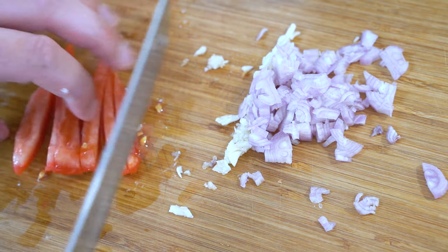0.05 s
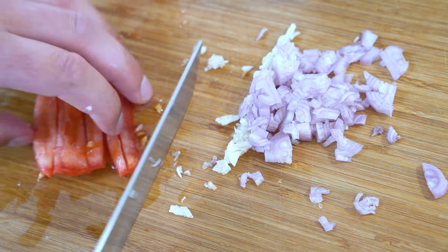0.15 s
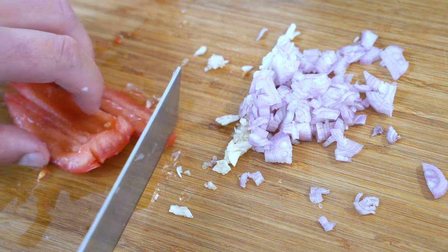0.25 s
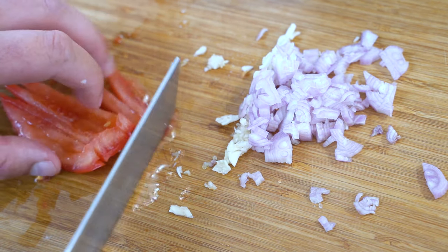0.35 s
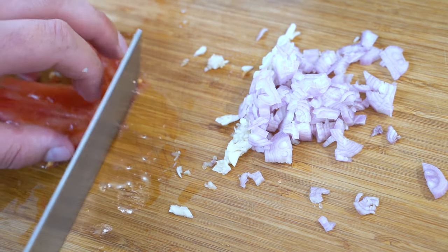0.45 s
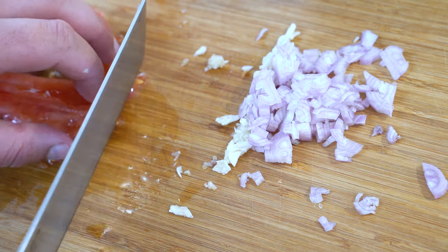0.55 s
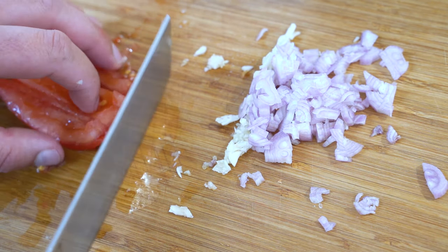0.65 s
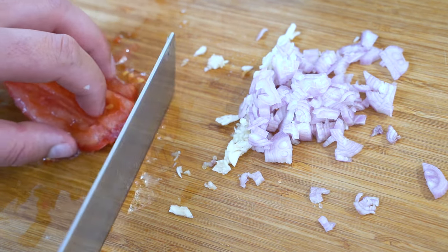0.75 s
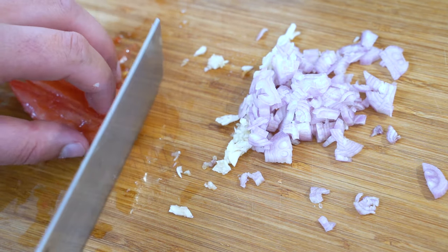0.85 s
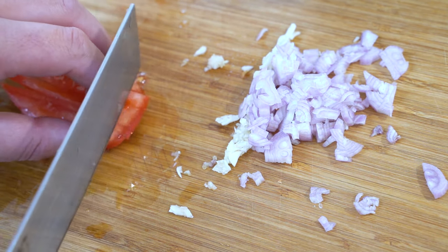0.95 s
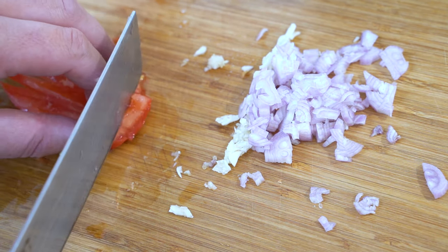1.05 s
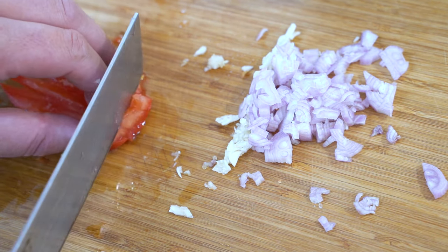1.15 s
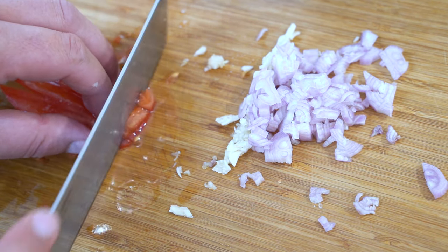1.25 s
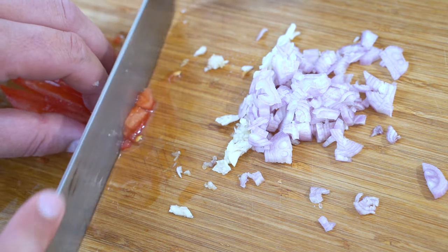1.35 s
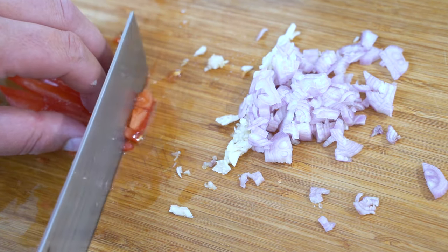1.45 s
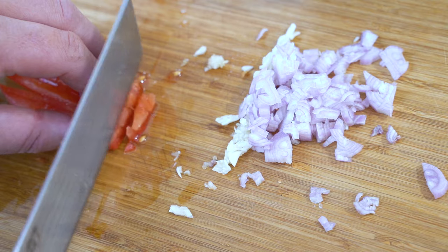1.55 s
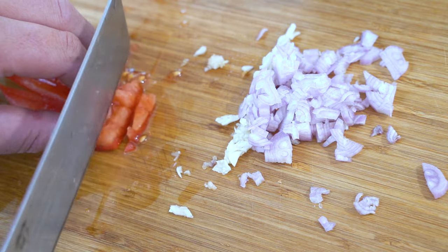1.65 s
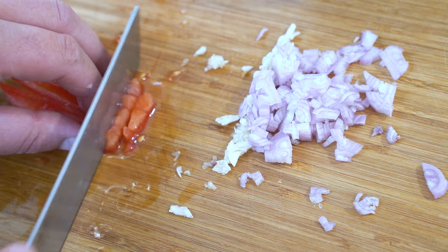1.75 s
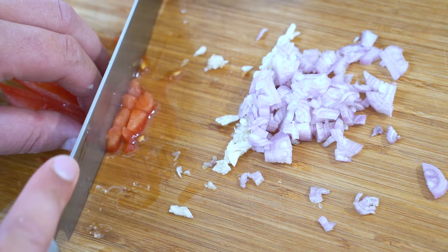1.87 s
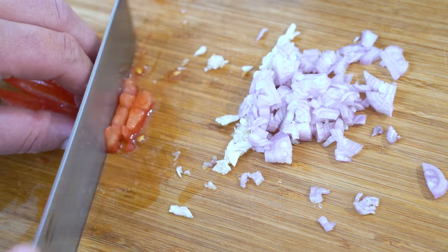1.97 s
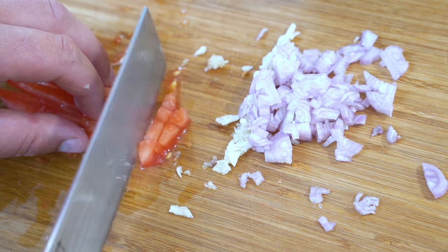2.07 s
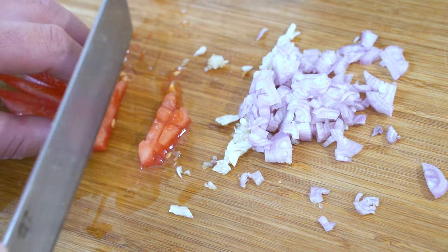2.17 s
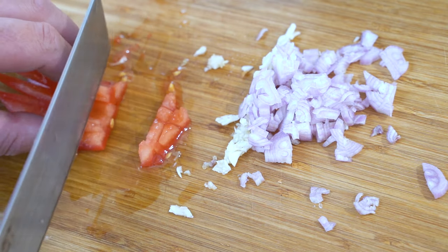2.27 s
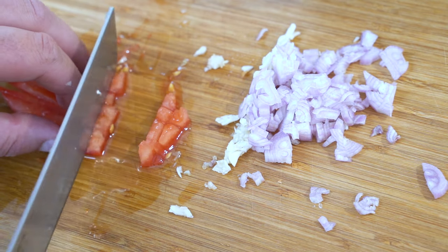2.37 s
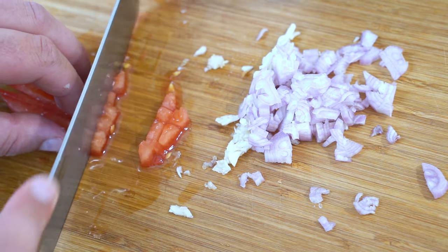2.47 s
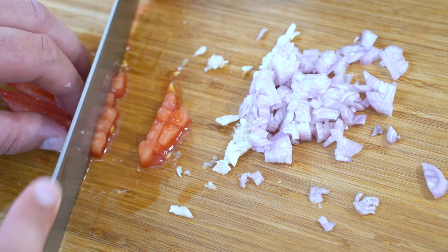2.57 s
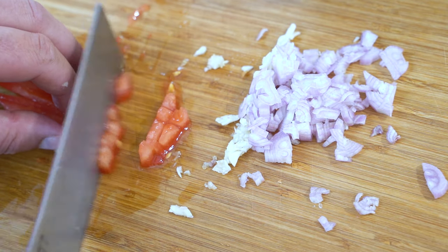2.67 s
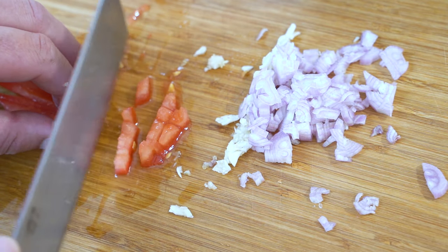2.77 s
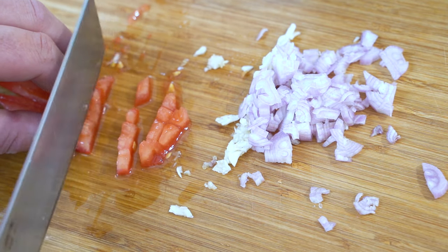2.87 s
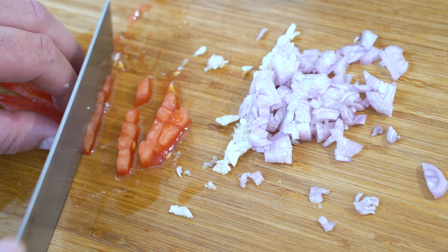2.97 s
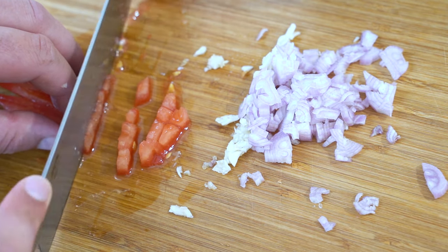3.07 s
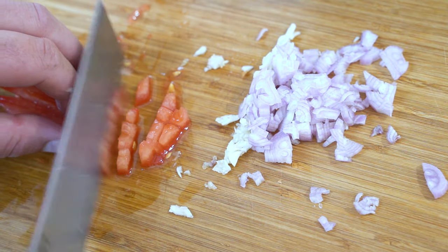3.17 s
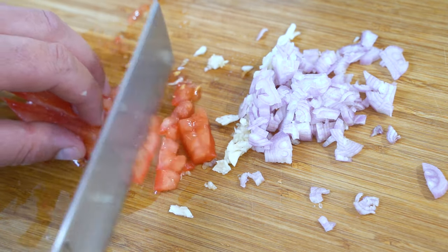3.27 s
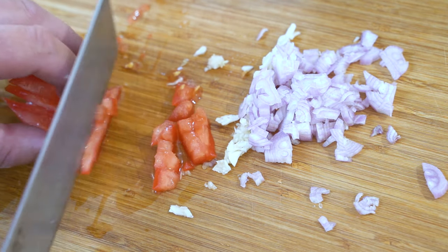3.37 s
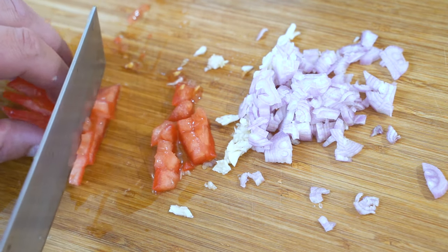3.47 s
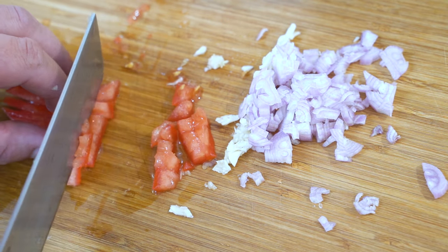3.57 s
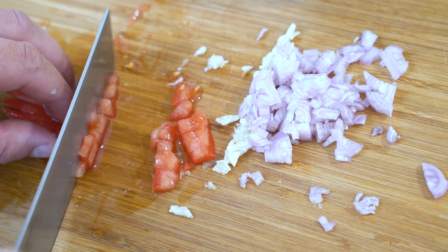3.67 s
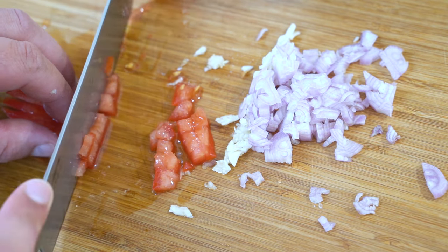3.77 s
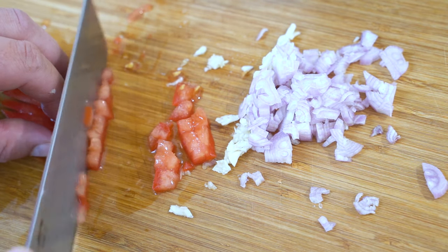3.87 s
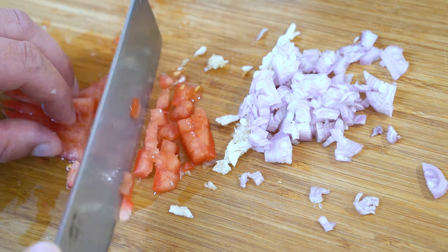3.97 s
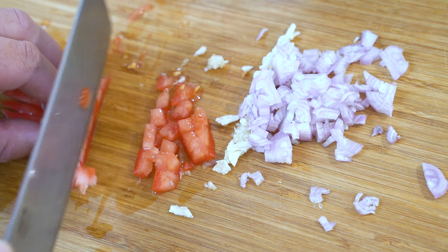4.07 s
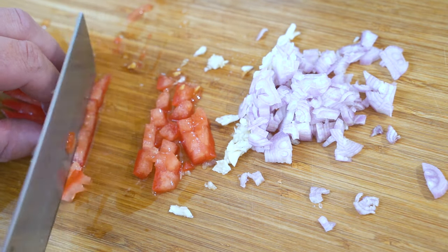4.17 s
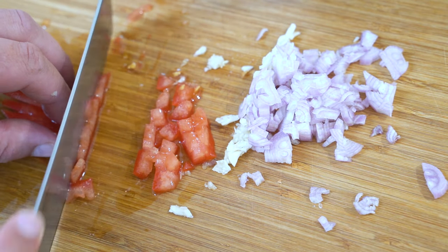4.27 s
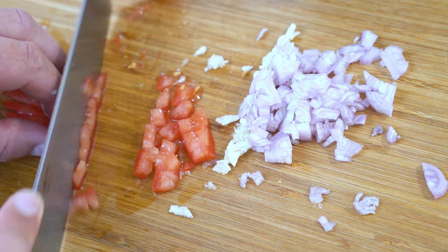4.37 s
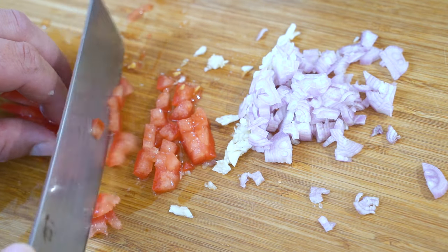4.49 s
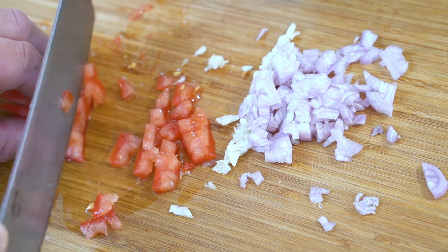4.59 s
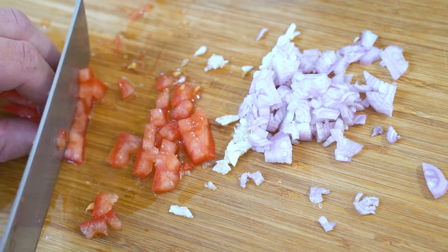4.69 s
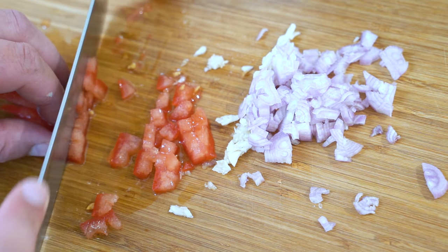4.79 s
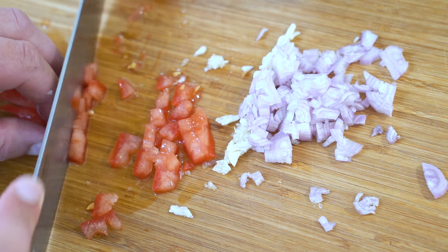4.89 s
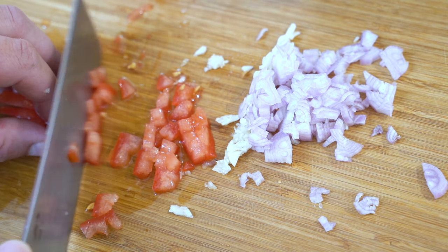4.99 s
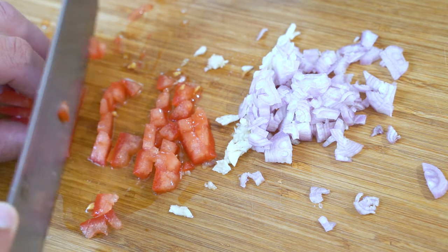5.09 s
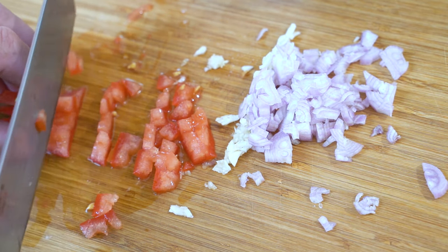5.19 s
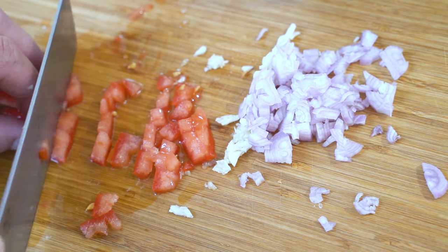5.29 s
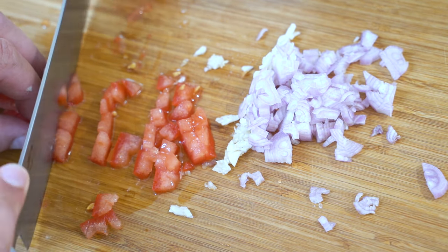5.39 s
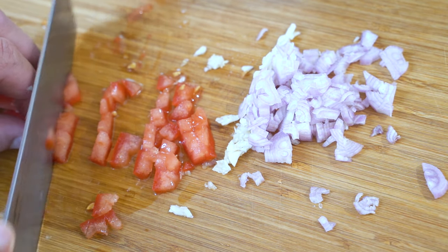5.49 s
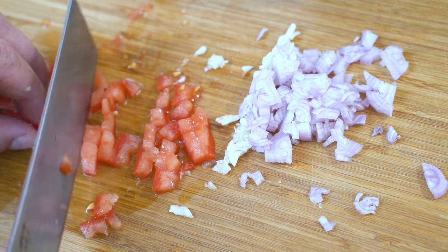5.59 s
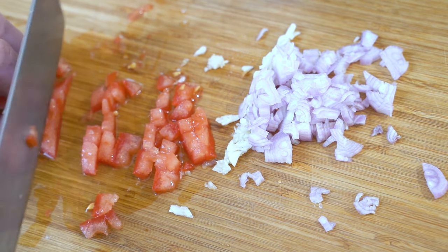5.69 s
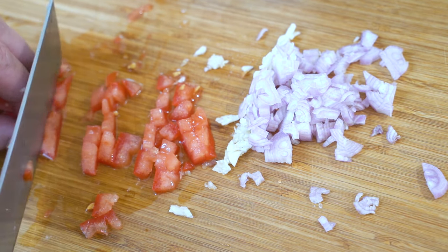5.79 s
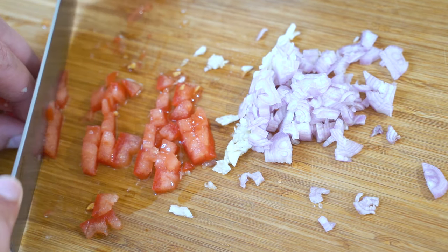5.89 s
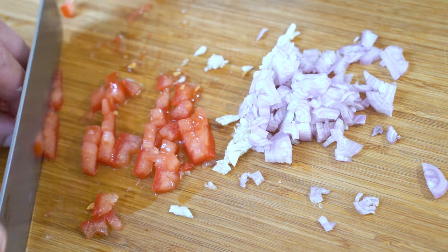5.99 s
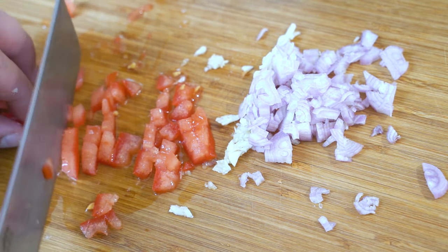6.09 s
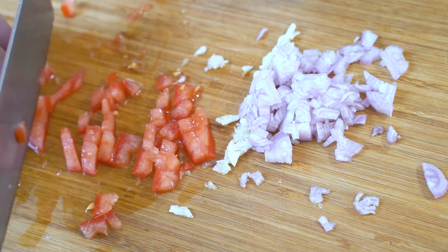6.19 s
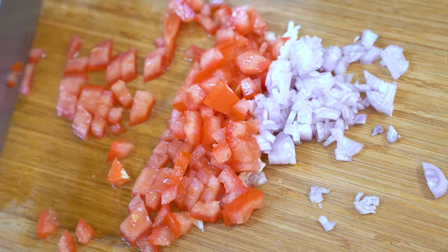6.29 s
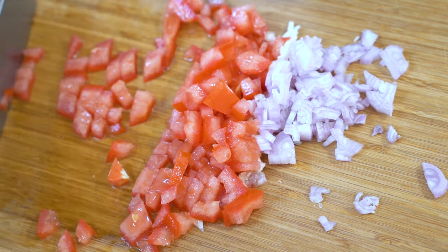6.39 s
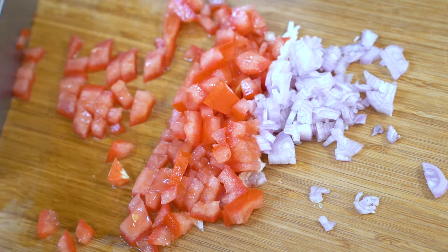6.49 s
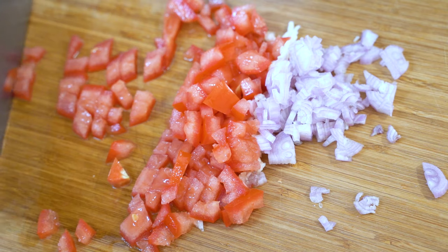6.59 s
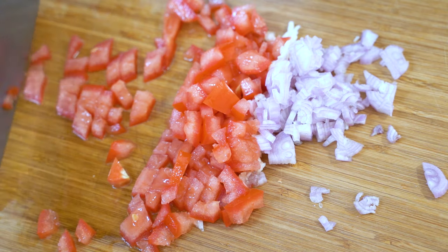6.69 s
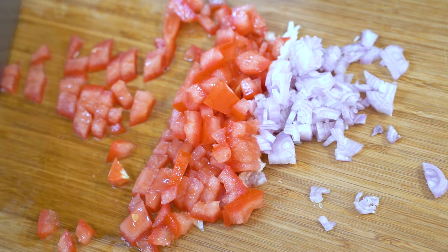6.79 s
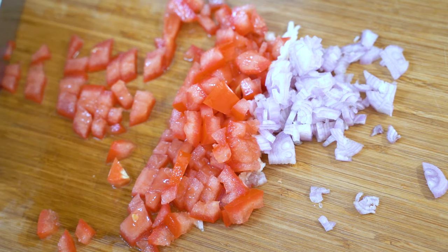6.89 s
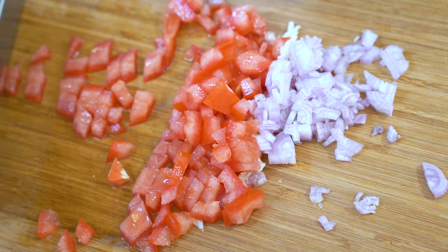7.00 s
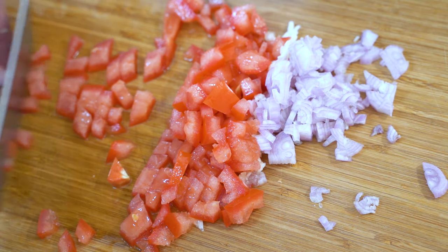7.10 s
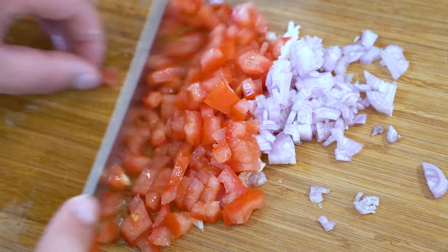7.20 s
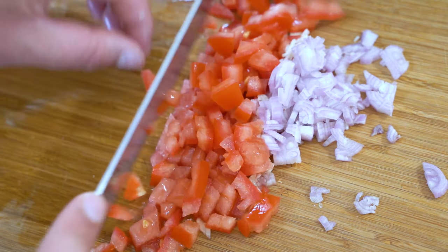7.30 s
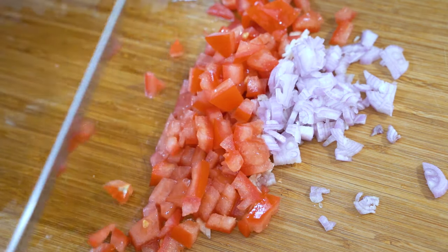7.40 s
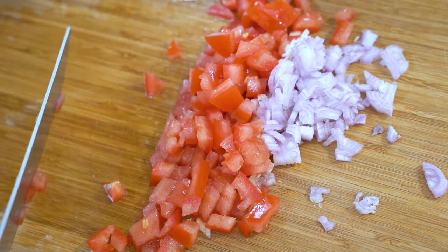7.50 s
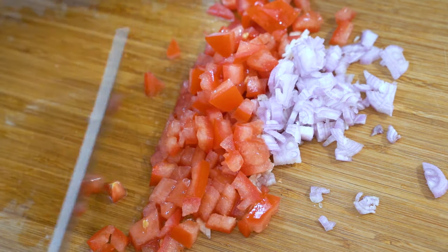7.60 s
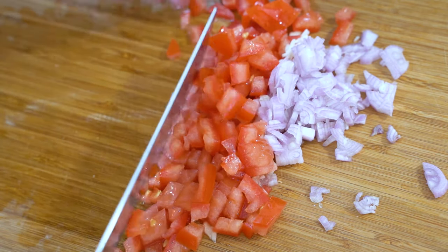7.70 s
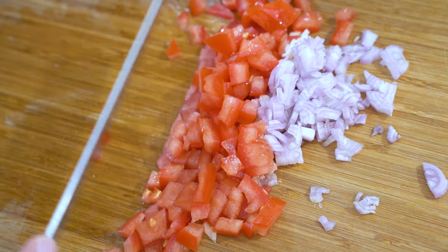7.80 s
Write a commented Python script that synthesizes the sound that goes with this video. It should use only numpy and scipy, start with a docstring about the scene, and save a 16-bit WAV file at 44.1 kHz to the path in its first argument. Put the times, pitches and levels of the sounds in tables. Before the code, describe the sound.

A knife dices tomato in steady, wet strokes on a wooden board, with crisp hisses and soft knocks, then scrapes the heap together.

```python
"""In a small kitchen, close to the microphone, a knife dices tomato on a wooden board.
Each stroke hisses through wet flesh (shaped noise), knocks on the board (ringing modes), rubs along it
(friction noise driving those modes) and flicks the dice aside (the steel rings); drawing back squeaks.
At the end the blade scrapes the heap together. The worktop thuds softly (low noise) over a quiet room."""
import sys
import numpy as np
from scipy import signal
from scipy.fft import rfft, irfft
from scipy.io import wavfile
from scipy.ndimage import uniform_filter1d

SR = 44100
rng = np.random.default_rng(int(sys.argv[2]) if len(sys.argv) > 2 else 0)


def amplitude_ratio(level_db):
    """Convert a level in decibels to the matching linear amplitude (field) ratio."""
    exponent = np.asarray(level_db, float) / 20
    return 10 ** exponent


def put_to_file(sound):
    """Save the sound as 16-bit audio at rate SR, in the file named by the first command-line argument."""
    columns = np.atleast_2d(sound).T  # one column per channel
    safe = np.clip(columns, -1, 1)
    whole_steps = np.round(safe * 32767)
    wavfile.write(sys.argv[1], SR, whole_steps.astype(np.int16))


N = 346185
T = np.arange(N) / SR
CLOCK = T[::16]  # coarse times at which gestures are computed

# edge meets wood: (time [s], relative blow level [dB], contact [ms], extra on upper board modes [dB])
LANDINGS = [(0.7803, -22.5, 0.35, -3), (1.2939, -22, 0.76, 9.5), (1.8367, -17, 0.77, 6),
            (2.4909, -23.5, 1, -8), (3.0525, -24, 1, -8), (3.7477, -31, 0.68, 0), (3.985, -48, 0.25, -1),
            (4.3244, -34.5, 0.65, 7), (4.490, -38, 0.6, -1), (4.819, -22, 0.8, 5), (5.395, -33, 0.56, -4),
            (5.908, -31.5, 0.36, 1), (6.4427, -7, 0.062, 4), (6.8739, -7.5, 0.075, 3),
            (7.6346, -21.5, 0.08, 7)]
# ways the board can ring: (pitch [Hz], level when struck [dB], level when rubbed [dB],
# time to fall 60 dB [s])
BOARD_MODES = [(128.7, -16, -11.5, 0.085), (273.9, -1, -11.5, 0.076), (372.6, -18, -14.5, 0.073),
               (470.6, 0.5, -7, 0.029), (562, -2, -7, 0.024), (712, 1.5, -2, 0.019),
               (855.5, 4, -4.5, 0.042), (959, -4, -14.5, 0.051), (1213, -5, -5, 0.014),
               (1374, -13, -16, 0.024), (1618, 3.5, -4, 0.014), (1757, -3, -3, 0.025),
               (2140, 3, -31.5, 0.029), (2580, -6, -43.5, .02), (2680, 1.5, -32.5, 0.024),
               (3000, -9, -31.5, 0.025), (3603, -15.5, -35, 0.0083), (4006, -17, -59, 0.01)]
UPPER_HZ = 1300  # board modes above this count as upper
# forward stroke: (hiss full from [s], rub full from [s], stop [s], hiss [dB], rub on upper modes [dB],
# rub on lower modes [dB]); a stop before a start counts as that start
PUSH_STROKES = [(1.273, 1.291, 1.56, -48.5, -64.5, -75), (1.823, 1.837, 1.82, -49.5, -57, -74),
                (2.477, 2.497, 2.575, -52, -56.5, -73.5), (3.036, 3.058, 3.046, -49.5, -60.5, -61.5),
                (3.73, 3.741, 3.96, -50.5, -62.5, -73.5), (4.277, 4.301, 4.4, -52.5, -66, -79),
                (4.796, 4.811, 4.885, -48.5, -64, -71.5), (5.374, 5.39, 5.36, -47.5, -66, -67.5),
                (5.892, 5.891, 5.96, -53.5, -76, -68.5), (6.459, 6.438, 6.7, -43, -101.5, -84.5),
                (6.886, 6.866, 6.99, -45.5, -89.5, -79), (7.677, 7.65, 7.49, -48, -63.5, -55)]
# blade drawn back over the wet wood: (start [s], stop [s], hiss at the stop [dB], rub [dB],
# squeak pitch halfway [Hz], squeak [dB])
DRAW_STROKES = [(0.391, 0.54, -63.5, -94.5, 900, -105), (1.451, 1.516, -60, -83, 1143, -83),
                (1.975, 2.065, -55.5, -77.5, 1000, -81.5), (2.65, 2.734, -52, -78, 1000, -81),
                (3.178, 3.241, -60, -79.5, 895, -84), (3.897, 3.96, -61.5, -79, 900, -91),
                (4.451, 4.497, -71, -79.5, 798.7, -93.5), (4.97, 5.031, -60, -79, 861, -78.5),
                (5.525, 5.594, -60.5, -79, 854, -75), (5.999, 6.085, -66.5, -81.5, 900, -87.5),
                (6.616, 6.707, -60, -75.5, 920, -100), (7.039, 7.225, -47.5, -74.5, 780, -94)]
# blade flicked sideways: (middle [s], half length [s], hiss [dB], steel [dB], main steel ring [Hz],
# board shove [dB])
SIDE_FLICKS = [(1.527, .04, -55.5, -89, 3090, -94), (2.069, 0.01, -43, -67, 3150, -77.5),
               (2.746, 0.025, -47, -67.5, 3180, -73), (3.239, 0.029, -40, -61, 3060, -63),
               (3.979, 0.034, -45, -68.5, 3196, -68), (4.505, 0.049, -60, -85.5, 3180, -81),
               (5.052, 0.016, -46.5, -69, 3250, -78), (5.618, .02, -46.5, -66, 3320, -81),
               (6.096, 0.02, -54, -79.5, 3350, -84), (6.707, 0.031, -65, -81, 3186, -93)]
# blade scrapes the heap together: (full from [s], stop [s], hiss [dB], steel [dB], main steel ring [Hz],
# board shove [dB], extra on upper rings [dB])
HEAP_SCRAPES = [(7.169, 7.272, -34, -60, 3150, -97, -4.5), (7.675, 7.714, -36, -64, 3210, -71, 9.5)]
# level slopes of drawing back: (rise, change while it lasts, fall) [dB per s]
DRAW_RUB = (650, 7.3, 600)


def level(x, db):
    """Scale to an rms level."""
    return x * amplitude_ratio(db) / np.sqrt(np.mean(x ** 2))


def colour(x, points):
    """Shape a noise by (Hz, dB) points; rms 1."""
    hz, db = np.transpose(points)
    bins = np.arange(len(x) // 2 + 1) * SR / len(x) + 1
    gain = amplitude_ratio(np.interp(np.log(bins), np.log(hz), db))
    return level(irfft(rfft(x) * gain, len(x)), 0)


def ring(force, hz, t60):
    """One decaying mode driven by a force; the moving surface radiates little below its pitch."""
    pole = np.exp(2j * np.pi * hz / SR - np.log(1000) / (t60 * SR))
    swing = signal.lfilter([1], [1, -pole], force).imag
    return np.diff(swing, prepend=0) * SR / (2 * np.pi * hz)


def walk(rate):
    """Random levels held 1 / rate s and smoothed twice; spread near 1."""
    hold = int(SR / rate)
    steps = np.repeat(rng.standard_normal(N // hold + 1), hold)
    return 1.3 * uniform_filter1d(uniform_filter1d(steps, hold), hold)[:N]


def grit(patchy_db, rate):
    """Friction force: noise that catches and slips."""
    return level(rng.standard_normal(N) * amplitude_ratio(patchy_db * walk(rate)), 0)


def gesture(start, stop, db, slopes):
    """Gain that climbs to db at start, drifts until stop and then dies away."""
    rise, drift, fall = slopes
    stop = max(stop, start)
    climbing = rise * np.maximum(start - CLOCK, 0)
    drifting = drift * (np.clip(CLOCK, start, stop) - start)
    falling = fall * np.maximum(CLOCK - stop, 0)
    return amplitude_ratio(db - climbing + drifting - falling)


def every_sample(gain):
    """Fill in a gesture's gain between the coarse times."""
    return np.interp(T, CLOCK, gain)


def knocks():
    """A short push per blow; a softer contact lasts longer and sounds duller. The steel adds a tick."""
    # tick colour: (frequency [Hz], relative level per Hz [dB])
    tick_tint = [(1000, -8.5), (3500, -6.5), (6500, -7.5), (15500, -26.5)]
    rock_ms, rock_db = 1.691, -4  # the curved edge rocks: the rest of it lands a moment later
    force, tick = np.zeros((len(BOARD_MODES), N)), np.zeros(N)
    upper = np.array(BOARD_MODES)[:, 0] > UPPER_HZ
    # each landing spot favours other modes
    spots = rng.standard_normal((len(LANDINGS), len(BOARD_MODES)))
    for (s, db, contact_ms, upper_db), luck in zip(LANDINGS, spots):
        near = slice(int(s * SR), int(s * SR) + 1000)
        t = T[near] - s
        push = 0
        for lag_ms, part_db in [(0, 0), (rock_ms, rock_db)]:
            progress = np.clip((t * 1000 - lag_ms) / contact_ms, 0, 1)
            push = push + amplitude_ratio(part_db) * np.sin(np.pi * progress) ** 2
        mode_gain = amplitude_ratio(db - 5.5 + upper * upper_db + 0.77 * luck)
        force[:, near] += np.outer(mode_gain, push / push.sum())
        tick[near] += amplitude_ratio(db - 33.0) * (t > 0) * np.exp(-np.abs(t) / 0.018)
    board = 0
    for k, (hz, db, _, t60) in enumerate(BOARD_MODES):
        sign = (-1) ** (k // 2)  # neighbouring pairs of modes start in opposite directions
        board = board + sign * amplitude_ratio(db) * ring(force[k], hz, t60)
    return board + tick * colour(rng.standard_normal(N), tick_tint)


def rubbing():
    """The edge stutters over the grain; as it travels, each board mode comes and goes."""
    # slopes (rise, change while it lasts, fall) [dB per s]
    push_rub, flick_rub, push_sing = (940, -34, 900), (2100, 0, 420), (623, 20, 390)
    sing_s = 0.061  # upper modes swell this long once the rub of a push is full
    flick_rub_db = -34.5  # against the hiss of the flick
    draw_upper_db = -3  # upper modes while drawing back
    force = grit(patchy_db=4.5, rate=90)
    flick = sum(gesture(s, s, db + flick_rub_db, flick_rub) for s, _, db, *_ in SIDE_FLICKS)
    draw = sum(gesture(a, b, db, DRAW_RUB) for a, b, _, db, *_ in DRAW_STROKES)
    sing = sum(gesture(a, a + sing_s, db, push_sing) for _, a, _, _, db, _ in PUSH_STROKES)
    push = sum(gesture(a, b, db, push_rub) for _, a, b, _, _, db in PUSH_STROKES)
    upper = every_sample(flick + amplitude_ratio(draw_upper_db) * draw + sing)
    lower = every_sample(flick + draw + push)
    out = 0
    for hz, _, db, t60 in BOARD_MODES:
        gain = upper if hz > UPPER_HZ else lower
        out = out + amplitude_ratio(db) * ring(force * amplitude_ratio(1.5 * walk(15)) * gain, hz, t60)
    return out


def slicing():
    """Wet, grainy hiss of skin, flesh and juice: patchy noise that follows each gesture."""
    # the edge splits the skin: (time [s], length [s], hiss [dB])
    nicks = [(1.244, 0.011, -75), (1.808, 0.012, -55.5), (2.374, .002, -66), (2.448, 0.041, -65),
             (2.987, 0.023, -61), (3.694, 0.011, -59.5), (4.235, 0.011, -53.5), (4.75, 0.031, -54),
             (5.342, 0.0027, -48.5), (5.837, 0.0044, -64), (5.872, 0.045, -55)]
    # hiss colour: (frequency [Hz], relative level per Hz [dB])
    hiss_tint = [(880, -52), (1500, -25.5), (3000, -6), (5600, -6), (12500, -5.5), (15300, -8.5),
                 (16000, -36)]
    # slopes (rise, change while it lasts, fall) [dB per s]
    nick_hiss, push_hiss, draw_hiss = (5000, 0, 3700), (1000, -92, 260), (770, 90, 650)
    scrape_hiss, after_hiss = (890, -58, 216), (1600, -62, 380)
    # share of a flick's half length at full hiss; rise per half length [dB]; fall [dB per s]
    hold, flick_rise_db, flick_fall = 0.14, 34, 277.5
    after_s, after_db = 0.15, -70.5  # juice hisses on as the blade leaves
    gain = sum(gesture(s, s + length, db, nick_hiss) for s, length, db in nicks)
    gain += sum(gesture(a, b, db, push_hiss) for a, _, b, db, *_ in PUSH_STROKES)
    for a, b, db, *_ in DRAW_STROKES:
        start_db = db - draw_hiss[1] * (b - a)
        gain += gesture(a, b, start_db, draw_hiss)
    for s, half, db, *_ in SIDE_FLICKS:
        gain += gesture(s - hold * half, s + hold * half, db, (flick_rise_db / half, 0, flick_fall))
        gain += gesture(s, s + after_s, after_db, after_hiss)
    gain += sum(gesture(a, b, db, scrape_hiss) for a, b, db, *_ in HEAP_SCRAPES)
    wet_noise = colour(grit(patchy_db=1.5, rate=350), hiss_tint)
    return every_sample(gain) * amplitude_ratio(0.81 * walk(25)) * wet_noise


def flicking():
    """A burst of friction rings the steel, whose pitch shifts with grip and load, and shoves the board."""
    # ways the blade can ring: (multiple of the main ring [ratio], level [dB], time to fall 60 dB [s])
    blade_modes = [(0.666, -2, .08), (.95, -8, 0.016), (1, 0.5, 0.032), (1.06, -7.5, 0.0093),
                   (1.419, -5.5, .03), (1.64, -7, 0.046), (1.72, -6, 0.028), (1.85, -5, 0.025),
                   (2.181, -3.5, .03), (2.55, -4.5, .015), (3.0, 0, 0.018), (3.331, 1.5, 0.011),
                   (4.0, 1, 0.016), (4.6, -8.5, 0.022)]
    shove_hz = 600  # only board modes below this are shoved
    edge_s = 0.05  # steel swells and fades this long around a scrape
    out, force = np.zeros(N), grit(patchy_db=-2.0, rate=710)
    bursts = [(*flick, 0) for flick in SIDE_FLICKS]
    bursts += [((a + b) / 2, (b - a) / 2 + edge_s, *rest) for a, b, *rest in HEAP_SCRAPES]
    for s, half, _, steel_db, main_hz, shove_db, upper_db in bursts:
        near = slice(int((s - half) * SR), int((s + half + .4) * SR))
        burst = force[near] * np.cos(np.pi / 2 * np.clip((T[near] - s) / half, -1, 1)) ** 2
        luck = rng.standard_normal(len(blade_modes))
        luck[0] -= 80 * half  # a long scrape holds the blade down and mutes its slowest bend
        for (ratio, db, t60), u in zip(blade_modes, luck):
            ring_db = steel_db + db + (ratio > 1) * upper_db + 2 * u
            out[near] += amplitude_ratio(ring_db) * ring(burst, ratio * main_hz, t60)
        for hz, db, _, t60 in BOARD_MODES:
            if hz < shove_hz:
                out[near] += amplitude_ratio(shove_db + db) * ring(burst, hz, t60)
    return out


def squeaking():
    """The wet edge drawn back excites one blurred resonance that slides upward."""
    glide, blur_t60_s = 0.15, 0.028  # share of the pitch gained over a draw; time to fall 60 dB
    gain, hz = 0, np.ones(N)
    for a, b, _, _, squeak_hz, db in DRAW_STROKES:
        gain = gain + gesture(a, b, db, DRAW_RUB)
        late = T > a - .1
        hz[late] = squeak_hz * (1 + glide * np.clip((T[late] - a) / (b - a) - .5, -1, 1))
    force = every_sample(gain) * (grit(patchy_db=6.5, rate=80) + 1j * rng.standard_normal(N))
    blur = signal.lfilter([1], [1, -np.exp(-np.log(1000) / (blur_t60_s * SR))], force)
    return (blur * np.exp(2j * np.pi * np.cumsum(hz) / SR)).real


def kitchen(x):
    """Echo of hard walls: decaying noise per band, starting after the first wall."""
    # echo bands: (middle [Hz], time to fall 60 dB [s], relative level [dB])
    echo_bands = [(157, 0.32, -1.5), (532, 0.31, -3.5), (1400, 0.33, -0.5), (3920, 0.58, -14.5),
                  (10730, 0.75, -33.5)]
    t = T[:SR]
    tail = 0
    for hz, t60, db in echo_bands:
        band_pass = signal.butter(2, [hz / 1.75, hz * 1.834], "band", fs=SR, output="sos")
        band = signal.sosfilt(band_pass, rng.standard_normal(SR))
        tail = tail + amplitude_ratio(db) * band * np.sqrt(1 / (t60 * SR)) * amplitude_ratio(-60 * t / t60) * 4
    first_wall = np.clip((t - .002) / 0.0016, 0, 1)
    return signal.fftconvolve(x, tail * first_wall)[:N]


def thudding():
    """The worktop takes the weight of every landing, flick and bump: low noise that swells at each."""
    # hand or arm bumps the worktop: (time [s], thud [dB])
    bumps = [(.02, -61), (.27, -57.5), (3.271, -51.5), (5.04, -47), (5.40, -47), (7.52, -53.5)]
    # thud colour: (frequency [Hz], relative level per Hz [dB])
    thud_tint = [(15, 0.5), (35, -2.5), (65, -1), (110, -7.5), (170, -12.5), (300, -42)]
    thud = (190, 0, 130)  # slopes (rise, change while it lasts, fall) [dB per s]
    land_db, land_lag_s, flick_db, rest_db = -53, 0.02, -57, -69.5
    loads = [(landing[0] + land_lag_s, land_db) for landing in LANDINGS]
    loads += [(flick[0], flick_db) for flick in SIDE_FLICKS]
    loads += bumps
    gain = amplitude_ratio(rest_db) + np.max([gesture(s, s, db, thud) for s, db in loads], axis=0)
    return every_sample(gain) * amplitude_ratio(1.5 * walk(22)) * colour(rng.standard_normal(N), thud_tint)


def room_tone():
    """Quiet shaped noise whose level wavers a little."""
    # room colour: (frequency [Hz], relative level per Hz [dB])
    room_tint = [(12, -47.5), (20, -3), (107, -8.5), (168, -7), (255, -0.5), (310, -12), (434, -1.5),
                 (624, -13), (802, -9), (1260, -21), (4810, -25.5), (12800, -20), (16000, -22)]
    return amplitude_ratio(-67 + 1.5 * walk(14.0)) * colour(rng.standard_normal(N), room_tint)


def scene():
    """Knife and board with their echo, over worktop thud and room tone."""
    near = knocks() + rubbing() + slicing() + flicking() + squeaking()
    return (near + kitchen(near) + thudding() + room_tone())[None]


def top_cut(x):
    """Nothing passes above the cut-off."""
    return signal.sosfilt(signal.butter(12, 16500, fs=SR, output="sos"), x)


def record(dry):
    """Turn the finished mix into the final sound."""
    return top_cut(dry)


dry = scene()
out = record(dry)
put_to_file(out)
```